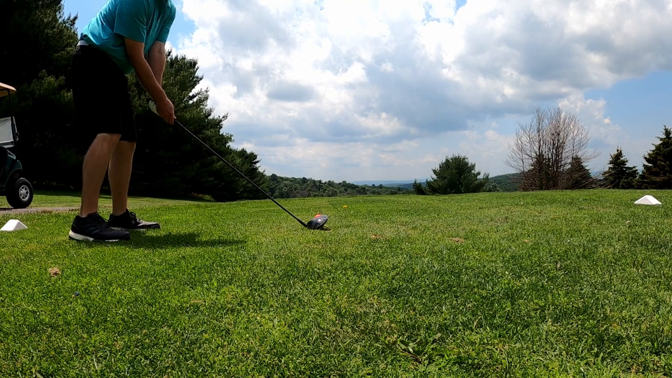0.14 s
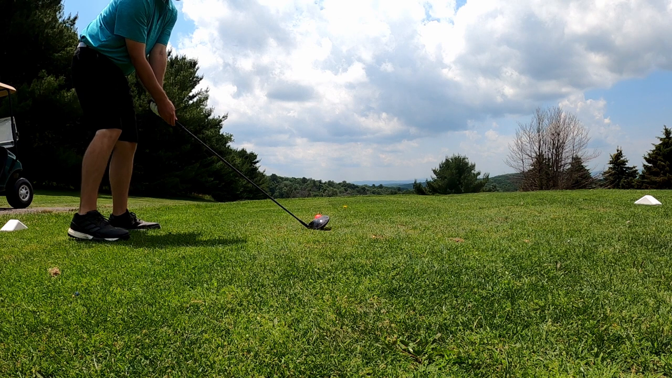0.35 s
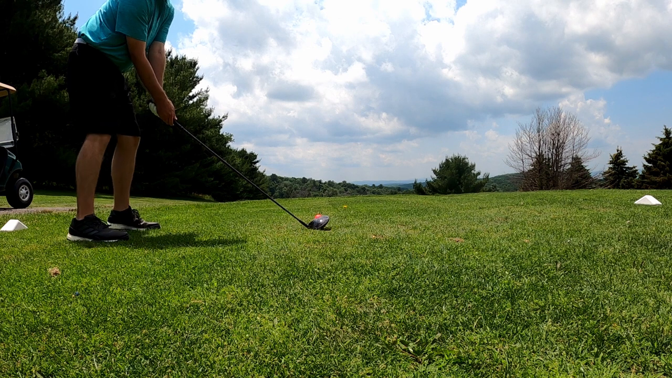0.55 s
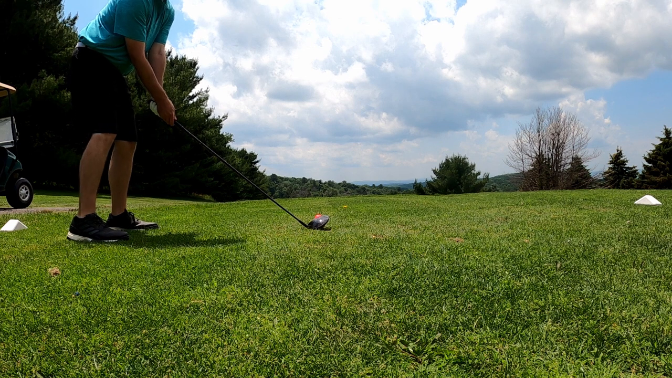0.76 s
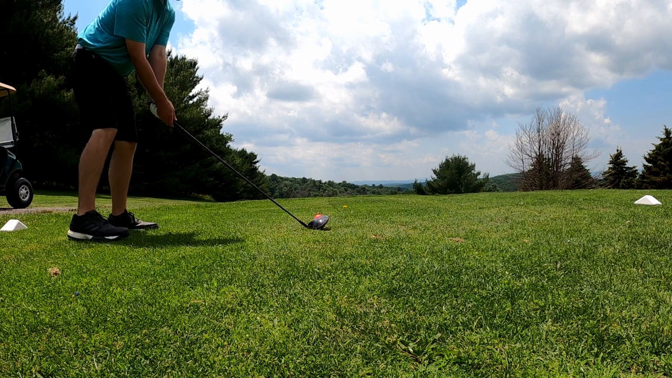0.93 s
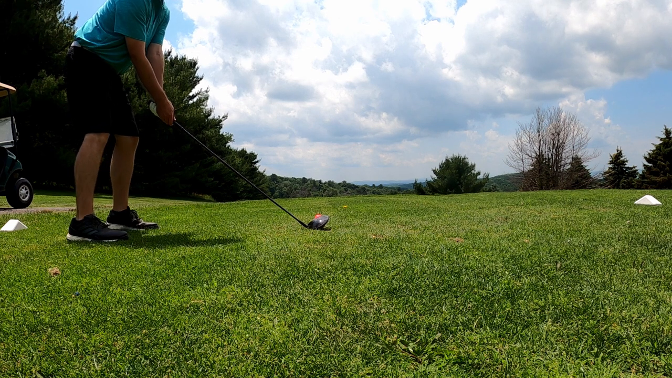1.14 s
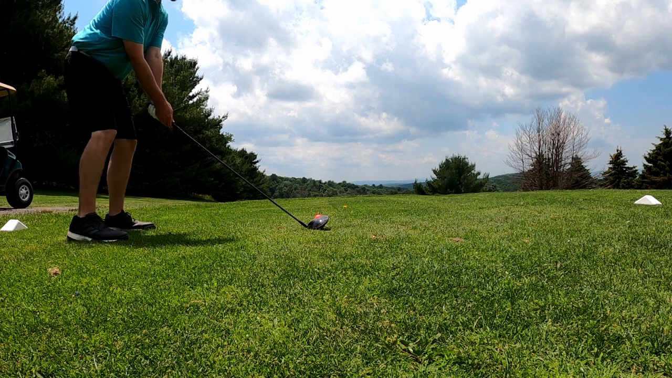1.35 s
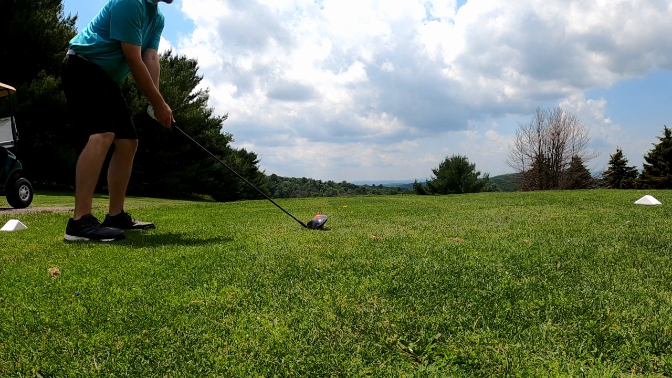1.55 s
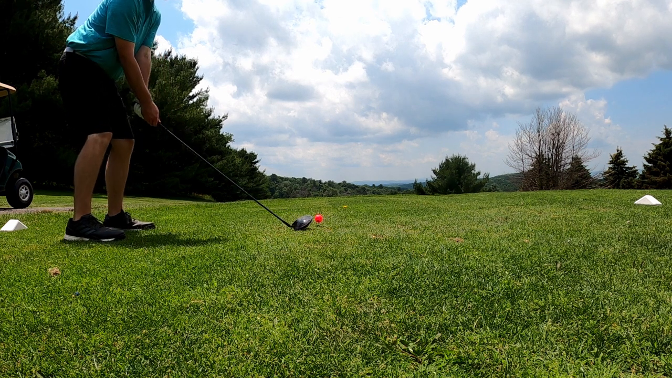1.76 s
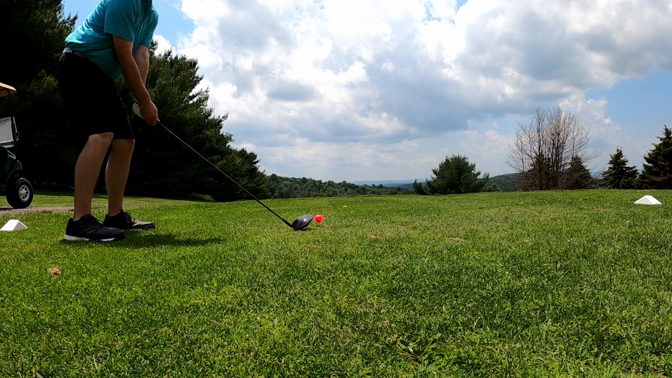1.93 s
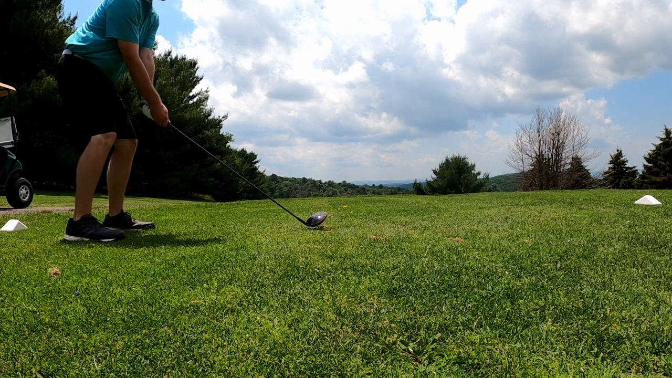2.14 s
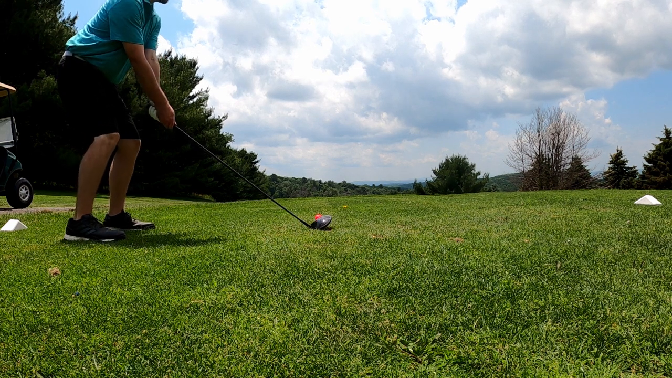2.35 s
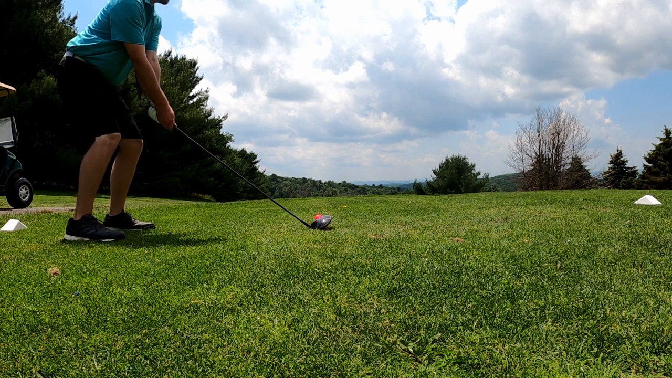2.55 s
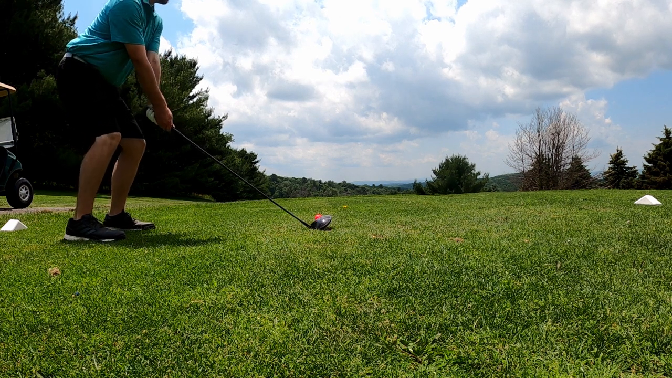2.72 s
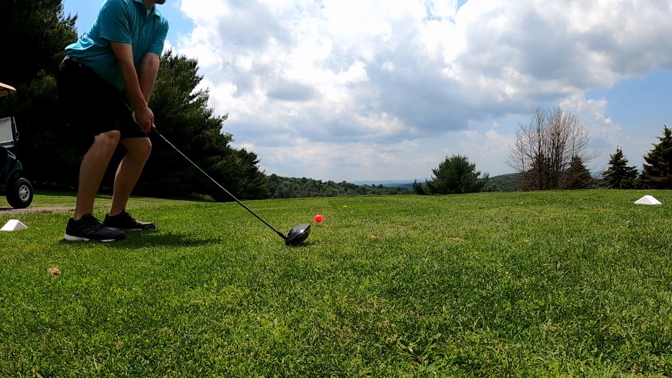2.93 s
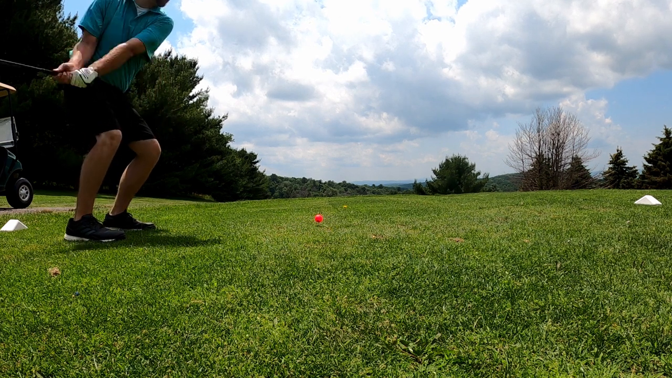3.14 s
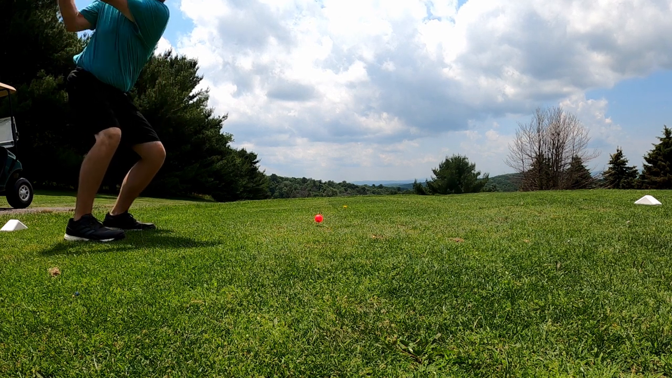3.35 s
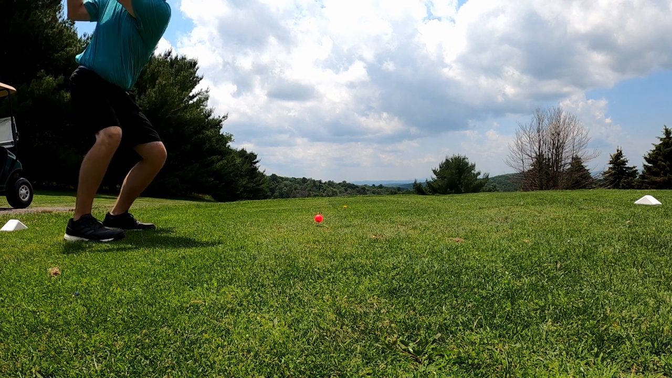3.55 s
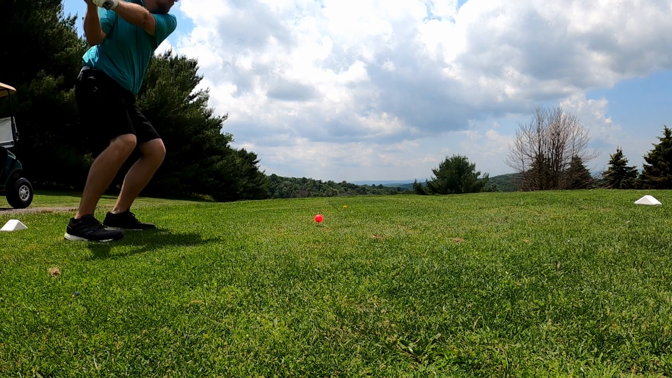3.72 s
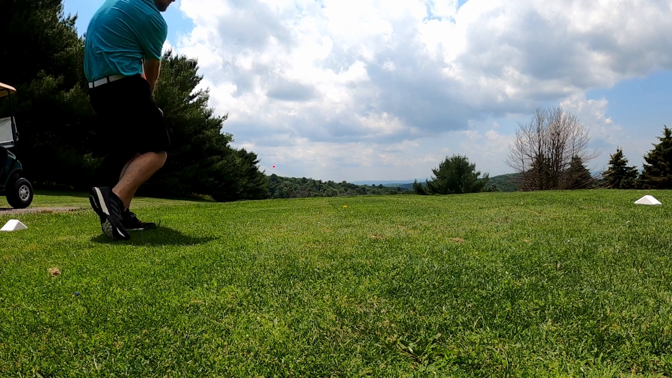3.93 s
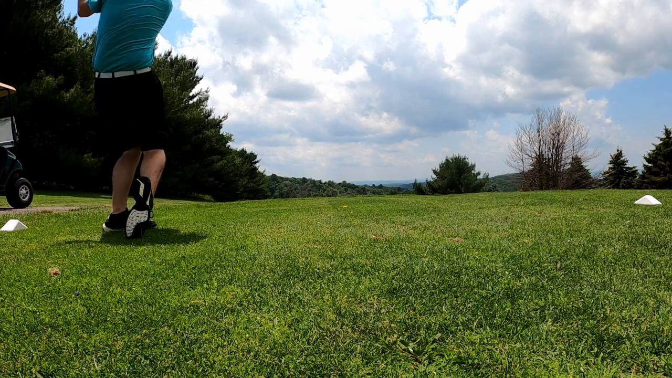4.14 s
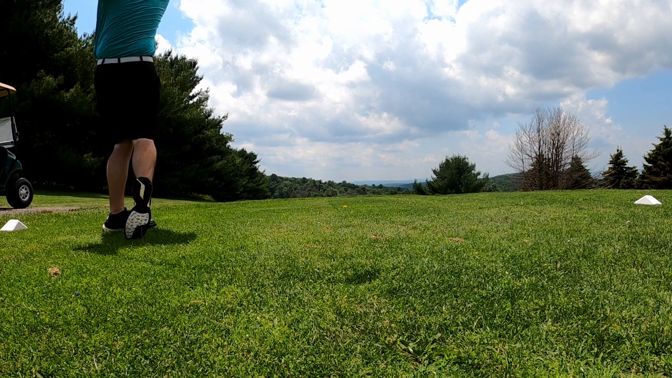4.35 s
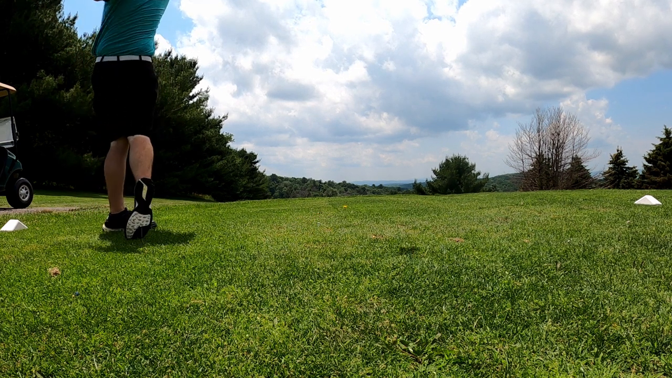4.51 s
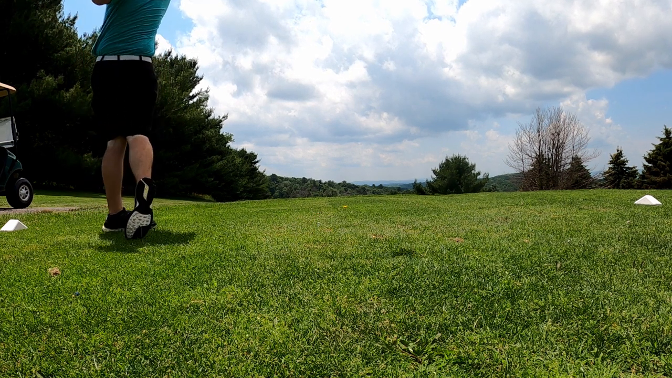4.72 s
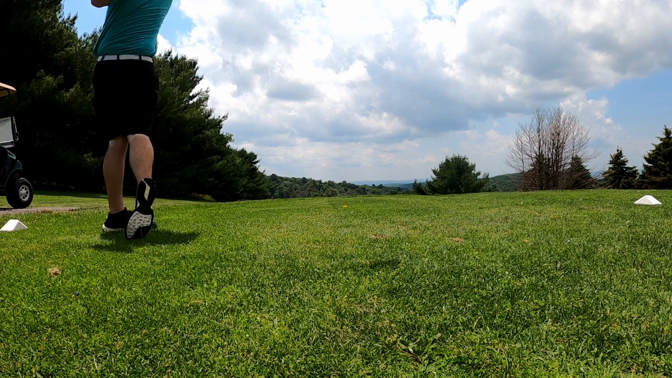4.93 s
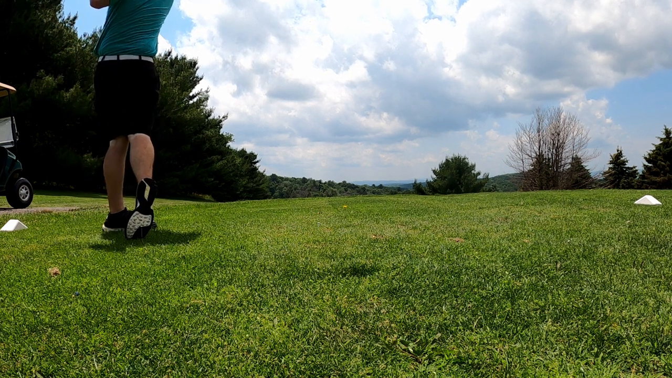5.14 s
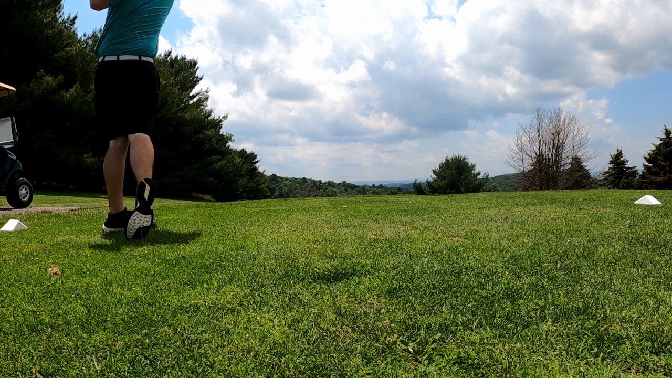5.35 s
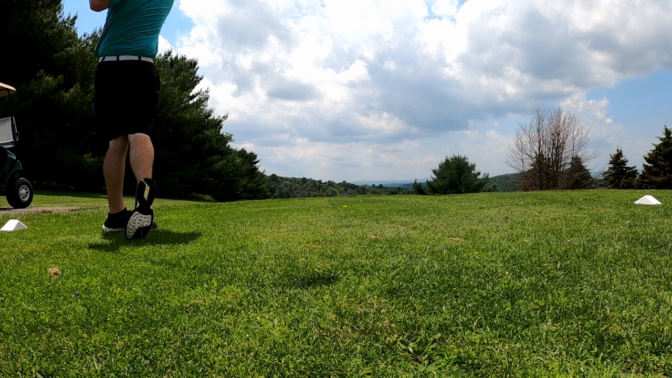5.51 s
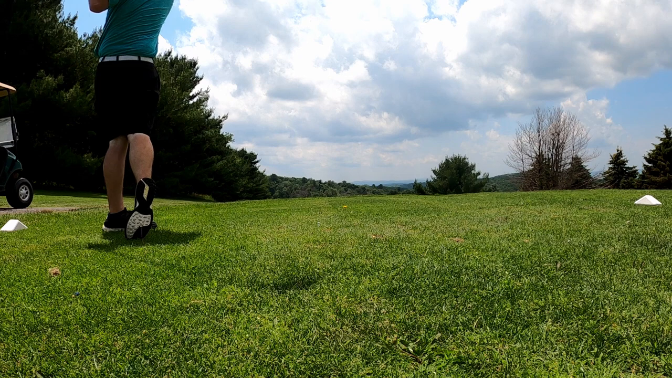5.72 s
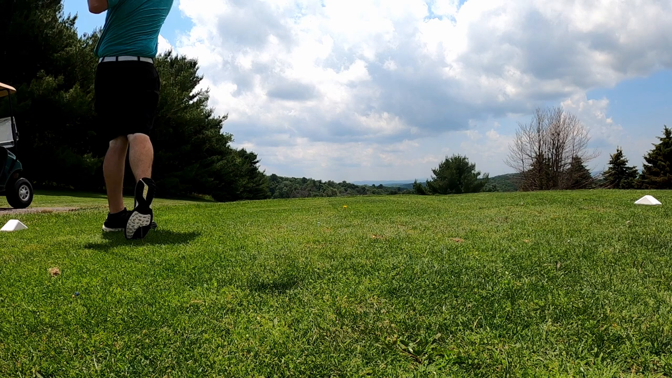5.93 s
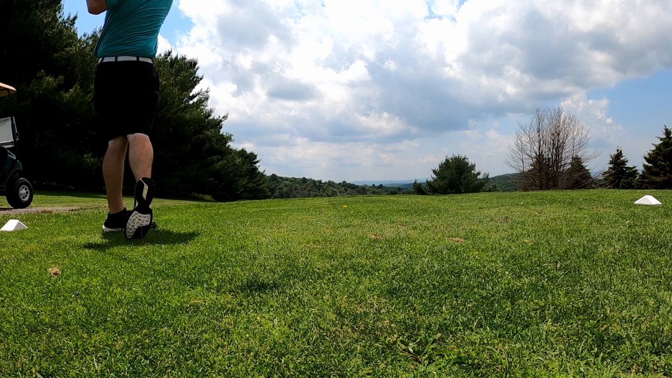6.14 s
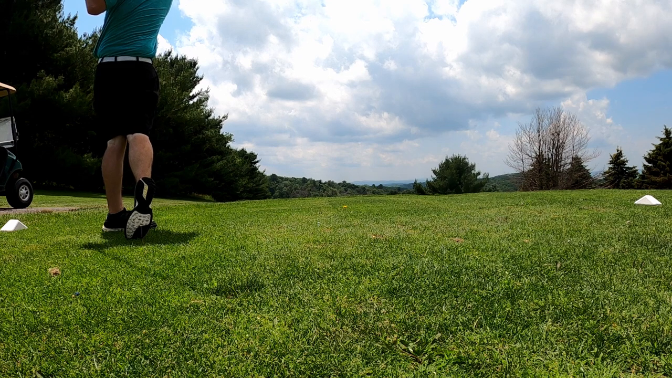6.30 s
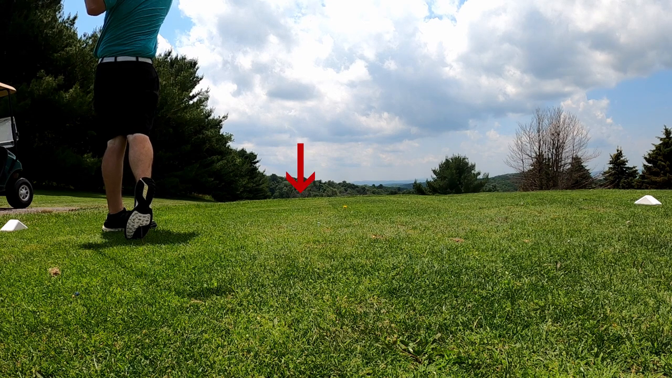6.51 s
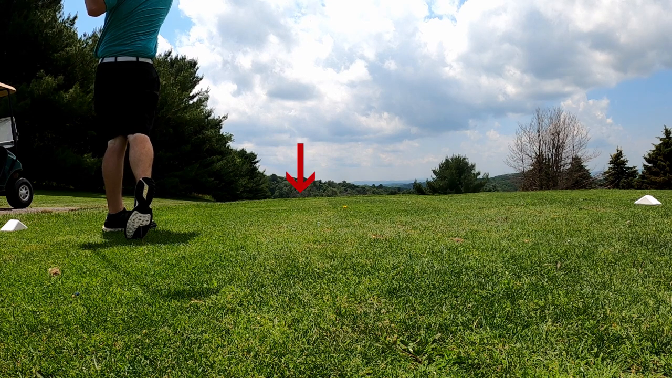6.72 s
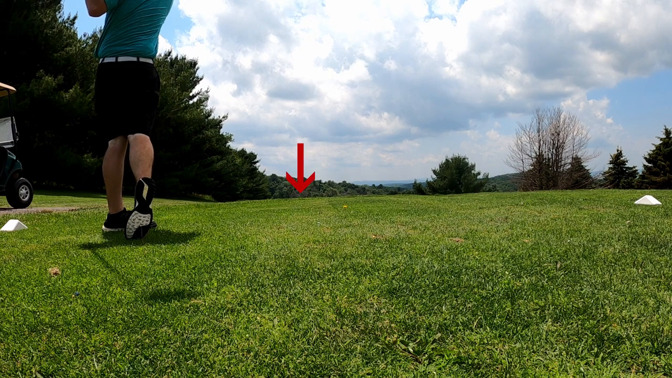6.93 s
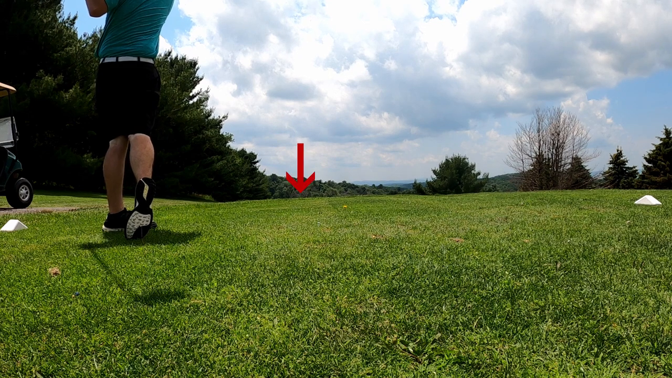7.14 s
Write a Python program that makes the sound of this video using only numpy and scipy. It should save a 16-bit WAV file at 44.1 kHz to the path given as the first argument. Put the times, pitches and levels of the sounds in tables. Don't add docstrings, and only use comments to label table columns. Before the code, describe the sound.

A quiet open meadow with several songbirds near and far, and gusts thumping on the microphone. Around three seconds grass rustles briefly under a club; a second later a rising rush of air ends in a dry, explosive golf ball hit, much louder than everything else. A short woody echo fades, then buzzy bird notes and a quick, high, steady trill sing over the wind.

```python
import sys
import numpy as np
from scipy import signal
from scipy.io import wavfile
from scipy.ndimage import uniform_filter1d

SR = 44100
rng = np.random.default_rng(int(sys.argv[2]) if len(sys.argv) > 2 else 0)


def rack_gain(trim_db):
    fader = np.asarray(trim_db, float)
    return 10 ** (fader / 20)


def transcribe(signal):
    frames = np.atleast_2d(signal).T
    limited = np.clip(frames, -1, 1)
    pcm = np.round(limited * 32767).astype(np.int16)
    wavfile.write(sys.argv[1], SR, pcm)


N = 316223

# time_s, shaft_roar_db, head_hiss_db, edge_fizz_db
SWING_AIR = [
    [(3.78, -73, -80, -100), (3.876, -60, -68.5, -91), (3.91, -54.5, -64, -88.5)],
    [(3.91, -58, -62, -88), (3.922, -56, -52, -83), (3.928, -46, -58, -86), (3.95, -40.5, -41, -71.5),
     (3.968, -35, -38, -61.5), (3.982, -34, -43.5, -58), (4.0, -33.5, -44.5, -57.5)],
]
FOLLOW_THROUGH = [(4.012, -38, -47, -56.5), (4.021, -60, -53, -76.5), (4.046, -61.5, -63, -77),
                  (4.075, -68.5, -72, -82.5), (4.101, -75, -78, -92)]
# time_s, pitch_hz, level_db
EDGE_TONES = [
    [(3.893, 5500, -69), (3.91, 6240, -59), (3.925, 7000, -51)],
    [(3.925, 6030, -53), (3.936, 6430, -40.5), (3.946, 6850, -40)],
]
# time_s, pitch_hz, level_db
WHIRR = [(3.982, 1405, -44), (3.995, 1423, -37.5), (4.008, 1450, -33)]
# pitch_hz, level_db, swell_t60_s
WAKE_HUM = (905, -17.5, .045)
IMPACT_S = 4.0092
# squash_hz, squash_db, recoil_hz, recoil_db, recoil_t60_s
BLOW = (1270, 7., 205, -2., .009)
# pitch_hz, level_db, t60_s
FACE = [(10080, -6.5, .005), (9240, -18, .011), (8766, -20.5, .011), (6127, -16, 0.00896),
        (6883, -13.5, 0.0069), (5160, -33.5, .1), (5800, -38, .03), (6600, -34, 0.068),
        (3044, -23.5, 0.0047), (7730, -26.5, .012), (11220, -20, .005), (13000, -27.5, .005)]
# pitch_hz, level_db, t60_s
CROWN = [(2300, -14, .06), (5950, -16, .08), (7700, -14, .08), (9500, -20, .06)]
# delay_s, swell_s, decay_speed, level_db
TREE_LINES = [(0.084, 0.012, 3.6, -50), (0.104, 0.015, 3., -49), (.135, .03, 2.4, -45),
              (.195, .035, 1.58, -50.5), (0.022, .15, 0.36, -53)]
# frequency_hz, t60_s
TREE_DECAY = [(300, 0.4), (1200, 0.99), (3000, 0.66), (7000, 0.96), (12000, 0.35)]
# frequency_hz, left_right_likeness
TREE_LIKENESS = [(1200, 0.79), (3000, 0.86), (5500, 1), (10000, .1)]

# time_s, level_db
BRUSH = [
    (2.8, -97.5),
    (3.088, -64),
    (3.16, -90),
]
# frequency_hz, level_db
BRUSH_COLOUR = [(350, -25), (600, -6.5), (1360, -4), (2370, -5.5), (2950, -5.5), (6150, -9.5), (9760, -4.5),
                (15500, -16)]
# time_s, level_db
SNAPS = [(0.576, -74)]
# peak_s, spread_s, level_db
NUDGES = [(1.91, .03, -80), (2.47, .04, -88)]
# time_s, level_db
RUSTLE = [(1.15, -82), (1.25, -69), (1.33, -77), (1.48, -66.5), (1.7, -76.5), (2.9, -87), (3.3, -69),
          (3.6, -75.5)]
# time_s, level_db
CREAK = [(3.74, -72), (3.75, -66.5), (3.8, -64.5), (3.87, -58.5), (3.92, -64), (3.94, -83)]

# start_s, length_s, from_hz, to_hz, peak_db
WARBLES = [(0.593, .013, 2900, 3350, -69), (0.65, 0.017, 2740, 2200, -57), (0.718, 0.015, 2750, 2260, -56),
           (0.873, 0.061, 3480, 3370, -75), (1.738, 0.027, 3300, 2710, -62.5),
           (1.774, 0.051, 2260, 2153, -63.5), (2.356, 0.028, 2400, 2100, -64.5),
           (2.726, 0.029, 3070, 3450, -62), (2.76, 0.036, 2840, 3450, -55.5),
           (2.799, 0.033, 2710, 2110, -60.5), (2.83, 0.013, 2150, 2730, -61),
           (2.917, .011, 2200, 2900, -66), (3.119, 0.0065, 3500, 2900, -60), (3.125, .008, 3500, 2930, -63),
           (3.309, .026, 3098, 3602, -64.5), (3.335, .02, 3600, 3620, -62.5),
           (3.381, 0.049, 2720, 2489, -62), (3.418, .022, 3082, 3005, -56.5)]
THROATY = [(2.852, 0.072, 2880, 2600, -62.5), (2.902, 0.023, 2520, 2150, -65.5),
           (2.929, 0.031, 2900, 2630, -65)]
LONE_NOTES = [(3.078, 0.038, 4235, 4100, -55.5), (3.157, 0.017, 5620, 5574, -60),
              (3.485, 0.13, 7430, 6970, -70), (3.503, 0.13, 6600, 6460, -58.5),
              (3.855, .02, 5870, 7500, -72), (4.045, 0.064, 3004, 2713, -67)]
# time_s, pitch_hz, level_db
PHRASES = [
    [(.603, 2150, -74), (.612, 2710, -69), (.621, 3260, -55), (.625, 3280, -62), (.629, 2600, -63),
     (.637, 2580, -60), (.643, 2750, -67), (.648, 3340, -51)],
    [(.693, 2350, -74), (.705, 2550, -61), (.709, 2770, -65), (.713, 3120, -60), (.717, 3530, -65)],
    [(1.705, 2140, -76), (1.712, 2910, -68), (1.72, 3220, -53), (1.731, 2840, -64), (1.738, 2560, -61),
     (1.745, 2800, -68)],
    [(2.16, 2180, -78.5), (2.21, 2410, -71), (2.24, 2600, -61), (2.252, 2590, -59), (2.264, 2210, -67),
     (2.275, 2110, -68), (2.31, 2130, -70), (2.341, 2130, -73)],
]

STEPS = [(0, 3060, -4), (.03, 2780, -2), (.056, 2760, -2.5), (.062, 2740, -16), (.095, 2680, -2),
         (.112, 2260, -9), (.13, 2300, -6), (.162, 2190, -6.5)]
STEP_TIMES = [(.027, -59.5), (1.088, -59)]
HOOK = [(0, 3800, -8), (.009, 3080, 1), (.017, 2520, 0), (.045, 2430, -2.5)]
HOOKS = [(.213, -65.5), (1.274, -59.5), (4.221, -63.5)]
LEAD = [(0, 2200, -2), (.015, 2280, 3), (.035, 2450, -6)]
LEADS = [(0, -74), (1.05, -67.5)]
PIPE = [(0, 3065, -10.5), (.02, 3056, -3), (.055, 3078, 0), (.092, 3110, -7), (.11, 3310, -23)]
PIPES = [(2.222, -57.5), (2.546, -62.5), (2.83, -56)]
SEEP = [(0, 6900, 4.5), (.015, 7400, 10), (.032, 7600, 2), (.062, 7560, 3), (.085, 7500, -19.5)]
SEEPS = [(0, -75), (1.385, -72.5), (2.729, -74)]
ARCH = [(0, 4500, -15), (.02, 5870, 1.5), (.04, 6600, 4), (.055, 6550, 6), (.072, 5600, 7)]
ARCHES = [(0.229, -68, 1.), (5.147, -71, 1.032)]
BUZZ = [(0, 3300, -10), (.04, 3580, -4), (.09, 3630, -3.5), (.13, 3720, 1), (.16, 3730, -1),
        (.172, 3440, -8)]
BUZZES = [(.395, -62, 1.), (.64, -64, 0.98), (5.315, -67.5, 0.98), (5.57, -65.5, 0.99),
          (5.815, -64.5, 0.99), (6.059, -70.5, 0.98)]
DROP = [(0, 5630, -8.5), (.011, 5540, -0.5), (.022, 4700, -2), (.032, 3580, -21)]
DROPS = [(2.347, -61), (2.657, -61.5), (2.943, -61), (3.162, -60.5)]
SLASH = [(0, 4500, -13.5), (.005, 5720, 2.5), (.012, 7200, 3)]
RISE = [(0, 3663, 4), (.012, 4488.5, 11), (.022, 5694.5, 13), (.028, 6950, 1), (.032, 5600, -3),
        (.038, 4200, -2), (.048, 3300, -7)]
RISES = [(.047, -75.5), (.132, -73), (.219, -70.5), (.305, -72.5), (.39, -70), (.473, -70), (.556, -69.5),
         (.647, -68), (.733, -68.5), (.815, -69.5), (.897, -71), (.984, -72.5), (1.077, -73.5),
         (1.166, -73.5), (1.252, -73), (1.338, -73), (1.423, -72), (1.513, -72), (1.599, -72.5),
         (1.689, -72.5), (1.776, -72), (1.868, -73), (1.953, -72.5), (2.04, -72), (2.126, -73.5)]
FALL = [(.001, 5224, -20), (.006, 5945, -3.5), (.011, 6218, 2.5), (.017, 6163, 0), (.024, 5470, -10),
        (.035, 4400, -0.5), (.044, 3772, -5.5), (.051, 2720, -20)]
FALLS = [(4.857, -69.5), (4.935, -60), (5.012, -56.5), (5.09, -56.5), (5.1661, -56), (5.2413, -57.5),
         (5.3161, -57), (5.3918, -55), (5.465, -54), (5.541, -52), (5.6179, -50.5), (5.6914, -50),
         (5.767, -48.5), (5.8426, -48.5), (5.9152, -48), (5.9899, -49), (6.066, -48), (6.138, -47),
         (6.2139, -45), (6.2886, -45.5), (6.363, -46.5), (6.439, -48), (6.5135, -47.5), (6.5884, -46.5),
         (6.6623, -45.5), (6.7362, -45), (6.8124, -45.5), (6.8892, -46.5), (6.964, -45.5), (7.0382, -45.5),
         (7.117, -45.5)]
# shape, then pace as start_s, period_s, level_db
FLICK = [(-.002, 7350, -11), (.003, 6700, -2), (.008, 6500, -2), (.02, 6450, -8)]
FLICK_PACE = (5.907, .0803, -72.5)
# body and tip shapes, then pace as start_s, period_s, level_db
RATTLE = [(.002, 4800, -3), (.007, 4300, 1), (.014, 3750, -3)]
RATTLE_TIP = [(0, 5200, -5), (.005, 6300, -5)]
RATTLE_PACE = (3.192, .0174, -64.5)
NOTE_IN_DB, NOTE_PEAK, NOTE_OUT_DB = -5.5, .55, -4.5

# peak_s, spread_s, left_db, right_db
GUSTS = [(0.129, 0.024, -56, -24), (0.432, 0.28, -31, -33), (0.83, 0.075, -28, -22),
         (1.038, 0.12, -31, -35), (1.351, 0.11, -33, -34.5), (1.526, 0.088, -24, -28.5),
         (1.684, 0.13, -22.5, -32), (1.887, 0.049, -25, -41), (2.13, 0.13, -46, -41),
         (2.328, 0.22, -22.5, -27.5), (2.75, 0.48, -38.5, -41), (3.009, 0.03, -17.5, -21),
         (3.31, 0.26, -28.5, -36.5), (3.54, 0.4, -28.5, -30.5), (4.011, 0.088, -22, -31.5),
         (4.49, 0.11, -32, -43), (4.747, 0.17, -23, -27.5), (4.93, 0.26, -32.5, -33.5),
         (5.439, 0.085, -21, -29), (5.841, 0.16, -31, -30), (6.1, 0.45, -41, -39.5),
         (6.839, 0.23, -34.5, -36.5), (7.02, 0.056, -24.5, -29), (7.141, 0.055, -15, -17.5)]
# frequency_hz, level_db
GUST_COLOUR = [(15, -8.5), (30, 1), (48, 1.5), (70, -2.5), (100, -10.5), (150, -20), (250, -44),
               (500, -92.5)]
GUST_FALL_DB, LULL_DB = 14, -53
# start_s, level_db, left_minus_right_db
POPS = [(0.528, -39.5, -0.5), (0.803, -40.5, -13), (1.52, -40, 1), (2.291, -34.5, 1), (3.002, -34.5, -7),
        (3.912, -45.5, 0.5), (4.479, -57, 7), (4.678, -36.5, 2), (7.115, -40, 6.0)]
POP_HZ, POP_T60_S = 190.7, 0.06
# pitch_hz, width_hz, level_db
DRONE = [
    (46, 13, -52),
    (95, 36, -54.5),
    (140.5, 19.45, -54.5),
    (183.4, 67, -62.5),
]
# frequency_hz, level_db_per_hz
MEADOW = [(160, -30), (280, -6.5), (471, -13.5), (807, -23), (923, -20), (1580, -23.5), (2250, -30),
          (3040, -31.5), (7500, -43), (10400, -53.5), (15500, -72.5)]
# time_s, low_hiss_db, high_hiss_db
LEAVES = [
    [(0.0, -72.5, -89), (2.08, -75.5, -97), (3.7, -75.5, -95)],
    [(4.45, -77, -95), (4.68, -74.5, -103), (7.17, -72.5, -101.5)],
]
# frequency_hz, left_right_likeness
LEAF_LIKENESS = [(60, 0.0112), (180, 0.37), (550, 0.4418), (1650, 0.18), (4970, 0.39), (15000, -0.43)]


def crack():
    squash_hz, squash_db, recoil_hz, recoil_db, recoil_t60 = BLOW
    t, blow = np.arange(6000) / SR, np.zeros(N)
    gone_s = IMPACT_S + 1 / squash_hz
    squash = rack_gain(squash_db) * np.sin(2 * np.pi * squash_hz * t) * np.clip(t / .0004, 0, 1)
    add(blow, IMPACT_S, squash * (t < 1 / squash_hz))
    recoil = rack_gain(recoil_db - 60 * t / recoil_t60) * np.cos(2 * np.pi * recoil_hz * t)
    add(blow, gone_s, recoil * np.clip(t / 0.000067, 0, 1))
    hum_hz, hum_db, hum_t60 = WAKE_HUM
    hum = rack_gain(hum_db - 60 * t / hum_t60) * np.sin(2 * np.pi * hum_hz * t + .9)
    add(blow, IMPACT_S - 500 / SR, -hum[500:0:-1])
    ring = np.zeros(N)
    for hz, db, t60 in FACE:
        add(ring, gone_s, rack_gain(db - 60 * t / t60) * np.sin(2 * np.pi * hz * t))
    turf = rack_gain(-33.5 - 60 * t / 0.035) * rng.standard_normal(len(t))
    add(blow, gone_s, signal.lfilter(*signal.butter(2, 9000, fs=SR), turf))
    off_turf = signal.lfilter(*signal.butter(2, [7500, 10500], "band", fs=SR), ring)
    return blow, ring + rack_gain(-11) * later(off_turf, 0.0028)


def swing():
    rows = [(3.7, -95, -110, -110)] + SWING_AIR[0] + SWING_AIR[1][1:] + FOLLOW_THROUGH
    out = burst(rows, band(300, 1189, 10.89), 0.79, 2.4)
    out += burst(rows, band(4400, 6000, 25), 0.6, 3.2, column=2)
    out += burst(rows, band(8000, 10500, 30), .1, 3.2, column=3)
    for tone_rows in EDGE_TONES + [WHIRR]:
        add(out, *tone(tone_rows))
    return out


def crown():
    t, out = np.arange(6000) / SR, np.zeros(N)
    for hz, db, t60 in CROWN:
        add(out, IMPACT_S, rack_gain(db - 60 * t / t60) * np.sin(2 * np.pi * hz * t))
    return out


def tree_lines(blow, ring):
    click = 25.0 * signal.unit_impulse(N, round(IMPACT_S * SR))
    far = signal.lfilter(*signal.butter(1, [350, 2600], "band", fs=SR), click) + 0.13 * (blow + ring)
    out = rack_gain(-56) * echoes(crown(), .088, .012, 4.5, clump_db=1.2)
    for delay_s, swell_s, speed, db in TREE_LINES:
        out += rack_gain(db) * echoes(far, delay_s, swell_s, speed, clump_db=1.7)
    return out


def grass():
    sweep = burst(BRUSH, lambda hz: read(BRUSH_COLOUR, hz), 0.47, 2.5)
    out = rack_gain([[4], [8.5]]) * sweep + burst(RUSTLE, band(1100, 1100, 9.9), 0.66, 3.1)
    for s, db in SNAPS:
        out += burst([(s, db), (s + 0.008, db - 14)], band(8000, 11000, 20), 0.47, 2.3)
    for s, spread_s, db in NUDGES:
        rows = [(s - spread_s, db - 7), (s, db), (s + spread_s, db - 8)]
        out += burst(rows, band(8500, 12500, 20), .3, 2.5)
    return out


def creak():
    unevenness = evened(uniform_filter1d(rng.standard_normal(N), 80))
    turns = np.cumsum(300 * np.clip(1 + .35 * unevenness, .1, 3)) / SR
    slips = np.diff(np.floor(turns), prepend=0) * rack_gain(3.4 * rng.standard_normal(N))
    t = np.arange(500) / SR
    modes = [(1030, 1), (1310, .9), (1620, 0.6)]  # pitch_hz, strength
    ring = rack_gain(-60 * t / 0.013) * sum(g * np.sin(2 * np.pi * hz * t) for hz, g in modes)
    ring = ring * np.clip(t / 0.0008, 0, 1)
    return rack_gain(along(CREAK) + 1.5) * evened(signal.oaconvolve(slips, ring)[:N])


def warbler_song():
    out = repeated(STEPS, STEP_TIMES) + repeated(HOOK, HOOKS) + repeated(LEAD, LEADS)
    for rows in PHRASES:
        add(out, *tone(rows, fading_db=3.0))
    wide_shake = glide(2.788, .02, 2980, 2880, -55.5)
    add(out, *tone(wide_shake, flutter=0.089, flutter_hz=125.7))
    for note in WARBLES:
        add(out, *tone(glide(*note), flutter=.014, fading_db=2.))
    for note in THROATY:
        add(out, *tone(glide(*note), flutter=0.06, flutter_hz=85.7, fading_db=0.0))
    slow_shake = glide(3.699, 0.11, 2990, 3070, -70)
    add(out, *tone(slow_shake, flutter=.025, flutter_hz=70., fading_db=4.))
    return out


def buzzer_song():
    out = repeated(SEEP, SEEPS) + repeated(ARCH, ARCHES)
    out += repeated(BUZZ, BUZZES, flutter=.055, flutter_hz=340., fading_db=1.5)
    upper = np.array(BUZZ) * [1, 1.22, 1]
    return out + repeated(upper, BUZZES, 0., -15., flutter=.045, flutter_hz=340., fading_db=4.)


def other_songs():
    out = repeated(DROP, DROPS) + repeated(SLASH, DROPS[:3], .039, -11.5)
    for note in LONE_NOTES:
        add(out, *tone(glide(*note)))
    return out


def rattler_song():
    events = steady(*RATTLE_PACE, -0.13, count=11)
    return repeated(RATTLE, events, fading_db=1.5) + repeated(RATTLE_TIP, events, fading_db=3.)


def faller_song():
    sagging = [(s, db, 1.012 - 0.016 * (s - 5)) for s, db in FALLS]
    trill = repeated(FALL, sagging, -.0075, -5.5, fading_db=2.2)
    trill += repeated(FLICK, steady(*FLICK_PACE, .6, count=16), fading_db=5.)
    shy = .45 * np.clip((5.5 - np.arange(N) / SR) / .3, 0, 1)
    trill -= shy * signal.filtfilt(*signal.butter(3, 5400, fs=SR), trill)
    dull = signal.lfilter(*signal.butter(5, 4900, fs=SR), trill)
    trill += rack_gain(-12) * later(dull, 0.039) + rack_gain(-22) * later(trill, .017)
    return trill, dull


def birds():
    warbler, piper, buzzer = warbler_song(), repeated(PIPE, PIPES), buzzer_song()
    others, rattler = other_songs(), rattler_song()
    riser = repeated(RISE, RISES, 0., -2., fading_db=2.5)
    riser += rack_gain(-9) * later(riser, .012)
    faller, dull = faller_song()
    near = placed(warbler, 11, -.3) + placed(piper, 26, -1.5) + placed(others + rattler, 6.5, -2.2)
    near += placed(riser, 6, -3.5) + placed(buzzer + faller, -1., .4)
    into_leaves = warbler + piper + others + 1.3 * buzzer + rack_gain(8) * rattler + rack_gain(4) * riser
    leafy = rack_gain([[-13], [-19]]) * echoes(into_leaves, .004, .01, 2.2)
    into_trunks = 1.25 * dull + .18 * faller + rack_gain(-10) * riser
    return near + leafy + rack_gain(-9.5) * echoes(into_trunks, .012, .012, 1.5)


def wind():
    lumps = noise(lambda hz: read(GUST_COLOUR, hz), -0.0038, 0.32, size=4096)
    t = np.arange(0, N + 100, 100) / SR
    power = rack_gain(2 * LULL_DB)
    for s, spread_s, left_db, right_db in GUSTS:
        peak_db = np.array([[left_db], [right_db]])
        power = power + rack_gain(2 * (peak_db - GUST_FALL_DB * abs(t - s) / spread_s))
    port_db = np.array([np.interp(np.arange(N) / SR, t, 10 * np.log10(p)) for p in power])
    tumble = noise(band(95, 160, 30), 0.96, 1.3, size=2048)
    return rack_gain(port_db) * lumps + rack_gain(1.7 * (port_db + 29.0) - 47.5) * tumble


def pops():
    t, out = np.arange(3000) / SR, np.zeros((2, N))
    knock = np.clip(t / 0.0043, 0, 1) * rack_gain(-60 * t / POP_T60_S) * np.sin(2 * np.pi * POP_HZ * t)
    for s, db, pan_db in POPS:
        add(out, s, rack_gain(db + 6 + np.array([[pan_db / 2], [-pan_db / 2]])) * knock)
    return out


def engine_colour(hz):
    humps = [rack_gain(2 * db) / w / (1 + ((hz - f) / (w / 2)) ** 2) ** 2 for f, w, db in DRONE]
    return 10 * np.log10(sum(humps))


def meadow():
    hum = rack_gain(-45.5) * noise(engine_colour, 1.0, 1.2, size=8192)
    rows = LEAVES[0] + LEAVES[1]
    low = noise(lambda hz: read(MEADOW, hz) + band(1, 3000, 9)(hz), LEAF_LIKENESS, 3.7)
    high = noise(lambda hz: read(MEADOW, hz) + band(4500, 20000, 9)(hz), LEAF_LIKENESS, 2.0)
    return hum + rack_gain(along(rows) + 8.0) * low + rack_gain(along(rows, column=2) + 20) * high


def read(points, hz):
    f, value = np.transpose(points)
    return np.interp(np.log(hz + 1), np.log(f + 1), value)


def along(rows, column=1):
    rows = np.array(rows, float)
    return np.interp(np.arange(N) / SR, rows[:, 0], rows[:, column], left=-150, right=-150)


def evened(x):
    return x / np.sqrt(np.mean(x ** 2) + 1e-20)


def add(mix, s, sound):
    part = mix[..., max(round(s * SR), 0):][..., :sound.shape[-1]]
    part += sound[..., :part.shape[-1]]


def later(x, s):
    return np.pad(x, (round(s * SR), 0))[:N]


def band(lo_hz, hi_hz, slope_db):
    def colour(hz):
        below = np.maximum(np.log2(lo_hz / (hz + 1)), 0)
        above = np.maximum(np.log2((hz + 1) / hi_hz), 0)
        return -slope_db * (below + above)
    return colour


def noise(colour, same, patchy_db, size=1024, count=N):
    frames, hz = 4 * count // size + 5, np.fft.rfftfreq(size, 1 / SR)
    a, b, c, d, patch = rng.standard_normal((frames, len(hz), 5)).T
    patch = evened(uniform_filter1d(uniform_filter1d(patch, 10, axis=0), 12, axis=1))
    same = np.clip(same if np.isscalar(same) else read(same, hz)[:, None], -1, 1)
    left, own = a + 1j * b, c + 1j * d
    z = np.array([left, same * left + np.sqrt(1 - same ** 2) * own])
    z *= rack_gain(colour(hz)[:, None] + patchy_db * patch)
    return evened(signal.istft(z, nperseg=size, noverlap=3 * size // 4)[1][:, :count])


def burst(rows, colour, same, patchy_db, column=1):
    out, a, b = np.zeros((2, N)), round(rows[0][0] * SR), round(rows[-1][0] * SR)
    out[:, a:b] = noise(colour, same, patchy_db, size=256, count=b - a)
    return out * rack_gain(along(rows, column=column))


def placed(x, pan_db, lag):
    k, share = np.arange(-8, 9), 2 / (1 + rack_gain(pan_db))
    window = np.hanning(19)[1:-1]
    ports = [(2 - share, lag / 2), (share, -lag / 2)]
    return np.array([g * np.convolve(x, np.sinc(k - d) * window, "same") for g, d in ports])


def echoes(x, start_s, rise_s, speed, clump_db=0.5):
    hz, t, z = signal.stft(rng.standard_normal((2, SR)), SR, nperseg=256)
    same = np.clip(read(TREE_LIKENESS, hz), 0, 1)[:, None]
    z = np.array([z[0], same * z[0] + np.sqrt(1 - same ** 2) * z[1]])
    decay = rack_gain(-60 * speed * t / read(TREE_DECAY, hz)[:, None])
    tail = signal.istft(z * decay, SR, nperseg=256)[1][:, :SR]
    clumps_db = clump_db * evened(uniform_filter1d(rng.standard_normal(SR), 500))
    tail = tail * np.clip(np.arange(SR) / SR / rise_s, 0, 1) * rack_gain(clumps_db)
    tail = np.pad(tail / np.linalg.norm(tail[0]), ((0, 0), (round(start_s * SR), 0)))
    return signal.fftconvolve(x[None], tail, axes=1)[:, :N]


def tone(rows, flutter=0., flutter_hz=118.7, fading_db=0.):
    s, hz, db = np.transpose(rows)
    t = np.arange(s[0], s[-1], 1 / SR)
    shake = flutter * np.sin(2 * np.pi * flutter_hz * t)
    hz = uniform_filter1d(np.interp(t, s, hz), 110, mode="nearest") * (1 + shake)
    edge = np.clip(np.minimum(t - t[0], t[-1] - t) / 0.0015, 0, 1) ** 2
    db = np.interp(t, s, db) + fading_db * evened(uniform_filter1d(rng.standard_normal(len(t)), 200))
    for _ in range(2):
        db = uniform_filter1d(db, 60, mode="nearest")
    edge = edge * (1 - 5 * shake)
    cycles = np.cumsum(hz) / SR + rng.random()
    return t[0], np.sqrt(2) * rack_gain(db) * edge * np.sin(2 * np.pi * cycles)


def glide(start_s, length_s, from_hz, to_hz, db):
    return [(start_s, from_hz, db + NOTE_IN_DB),
            (start_s + NOTE_PEAK * length_s, from_hz + NOTE_PEAK * (to_hz - from_hz), db),
            (start_s + length_s, to_hz, db + NOTE_OUT_DB)]


def steady(start_s, period_s, db, slope_db, count):
    return [(start_s + k * period_s, db + slope_db * k) for k in range(count)]


def repeated(shape, events, offset_s=0., gain_db=0., **voice):
    out = np.zeros(N)
    for s, db, *factor in events:
        pitch = factor[0] if factor else 1
        start_s, sound = tone(np.array(shape) * [1, pitch, 1], **voice)
        add(out, s + offset_s + start_s, rack_gain(db + gain_db) * sound)
    return out


def scene():
    blow, ring = crack()
    club = placed(blow, -1.6, 1.8) + placed(ring, -3.2, .8) + placed(creak(), 1, .7)
    club[0] = signal.filtfilt(*signal.butter(2, 12500, fs=SR), club[0])
    return club + swing() + tree_lines(blow, ring) + grass() + birds() + wind() + pops() + meadow()


def roll_off(x):
    return signal.sosfilt(signal.butter(12, 16320, fs=SR, output="sos"), x)


def record(dry):
    overloaded = .97 * np.tanh(dry / .97)
    mix = signal.sosfilt(signal.butter(6, 14500, fs=SR, output="sos"), overloaded)
    return roll_off(mix)


dry = scene()
out = record(dry)
transcribe(out)
```